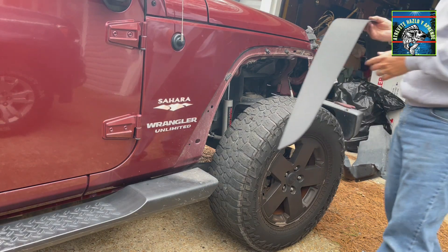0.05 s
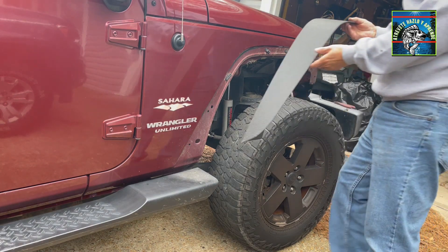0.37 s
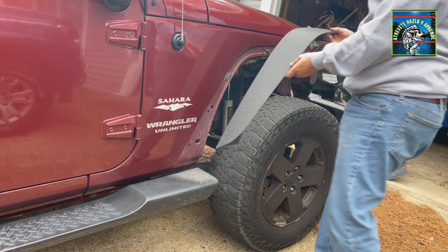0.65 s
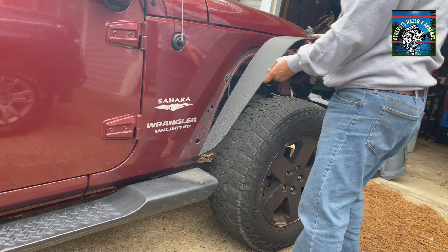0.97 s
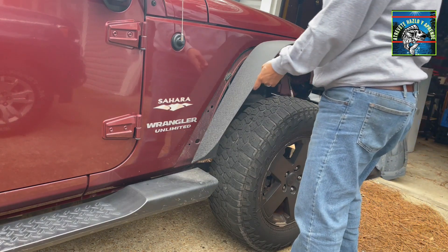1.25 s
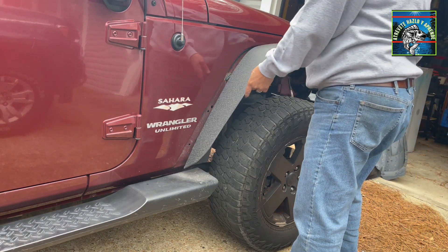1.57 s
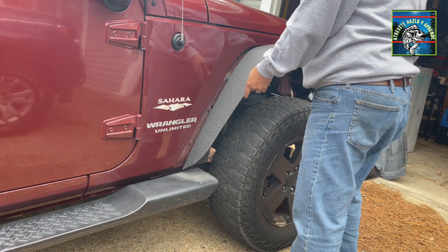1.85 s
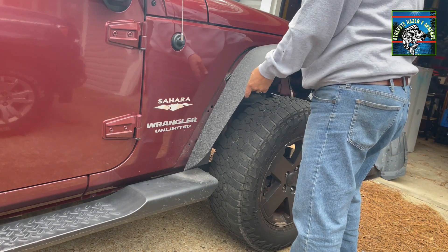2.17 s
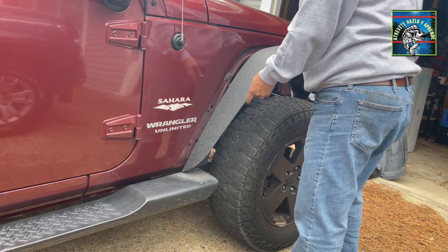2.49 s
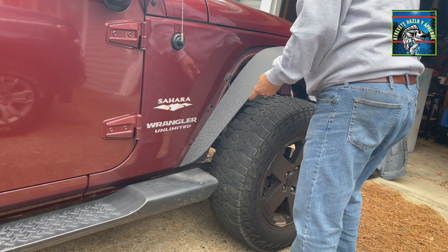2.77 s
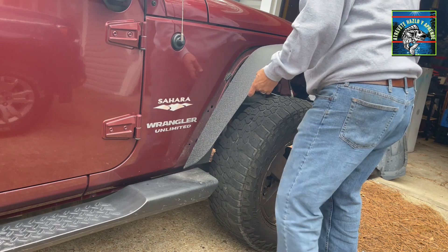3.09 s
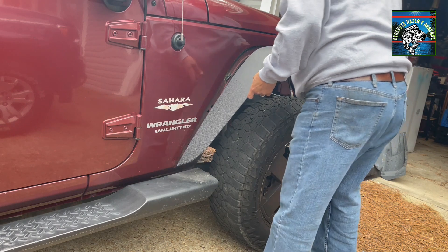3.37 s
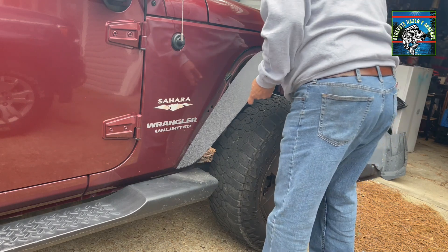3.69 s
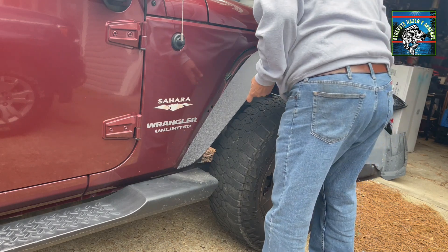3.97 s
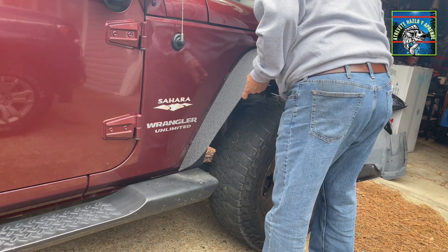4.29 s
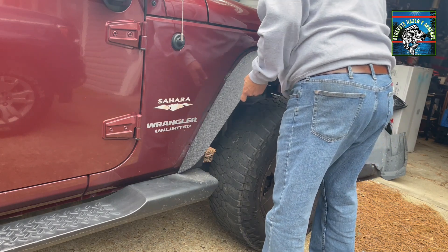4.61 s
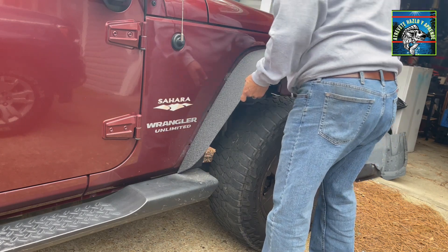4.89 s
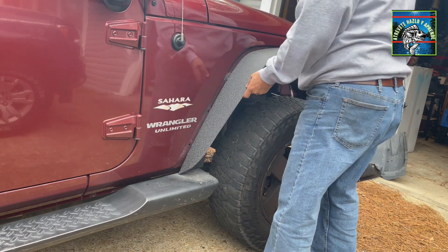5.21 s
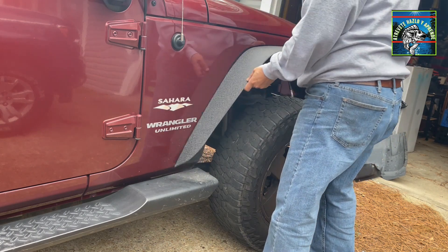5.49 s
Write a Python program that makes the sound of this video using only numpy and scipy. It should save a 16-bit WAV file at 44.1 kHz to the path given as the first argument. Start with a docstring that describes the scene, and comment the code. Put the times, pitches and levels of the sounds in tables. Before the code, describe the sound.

A low outdoor rumble with faint hiss runs throughout. For the first second and a half there are only light ticks and scuffs from a plastic fender panel being handled. At about 1.6 seconds it clatters against a car's steel body: hollow clacks with a brief ring, a buzzing edge and a dull boom. A soft rub and clothing brush follow, then a sharp crack at 2.3 seconds. Small clicks near 3.1 seconds lead to a run of knocks from 3.3 to 3.8. Grainy rubbing of plastic on paint builds, swelling with scuffs and knocks around 4.3 seconds. The loudest crack comes at 4.6, with a quick chatter behind it. The rubbing continues under two more knocks at about 5.4 and 5.5 seconds. The contacts are close and slightly to the left, with a short, dull echo off the ground and the car.

```python
"""A plastic fender panel knocks and chatters against the steel wing of a parked car as it is fitted.
The plastic clacks and rings, its edge buzzes and the bodywork booms after it.
Sharp contacts, from light clicks to hard cracks, each leave a brief pitched ring.
Between knocks the panel scuffs, ticks and slides along the paint, and clothes brush past.
The ground and the car's side throw back a short echo, all over a low outdoor rumble."""
import sys
import numpy as np
from scipy import signal
from scipy.fft import rfft, irfft
from scipy.io import wavfile
from scipy.ndimage import uniform_filter1d

SR = 44100
rng = np.random.default_rng(int(sys.argv[2]) if len(sys.argv) > 2 else 0)


def generate_wav(signal):
    """Clip the signal to [-1, 1] and save it as 16-bit WAV at the path in sys.argv[1]."""
    frames = np.transpose(np.atleast_2d(signal))
    scaled = np.clip(frames, -1, 1) * 32767
    pcm = np.round(scaled).astype(np.int16)
    wavfile.write(sys.argv[1], SR, pcm)


N = 244604

# bright tick of plastic: freq_hz, density_db
TICK_COLOUR = [(700, -42), (1500, -1), (2200, 4.5), (3100, -1.5), (3900, -1.5), (6500, -12.5),
               (11000, -8.5), (14000, -21)]
# the edge buzzing on steel: freq_hz, density_db
BUZZ_COLOUR = [(900, -9), (1500, 5.5), (2200, 3), (2900, -1), (3500, -7), (4500, -24), (7000, -43)]
# fine friction hiss: freq_hz, density_db
HISS_COLOUR = [(3000, -1.5), (7000, -3), (10000, -1), (12500, -4.5), (15000, -18)]


def knocks(contact_s=0.00052):
    """Each contact sets the plastic clacking and ringing, rattles its edge and shakes the steel."""
    # panel meets body: start_s, clack_db, clack_t60_s, ring_db, favoured_hz, boom_db, rattle_db
    hits = [(1.535, -35.5, 0.19, -44.5, 330, -40, -58), (1.603, -19, 0.15, -27.5, 587, -40, -47),
            (1.611, -18.5, 0.087, -24.5, 440, -24.5, -54), (1.631, -36, 0.11, -28.5, 434, -41, -48),
            (1.640, -40, 0.12, -50, 450, -40, -41), (1.660, -26.5, 0.25, -28.5, 290, -27.5, -53),
            (1.702, -33.5, 0.23, -30.5, 240, -28.5, -55), (1.738, -37, 0.23, -42, 300, -37.5, -53.5),
            (1.764, -44, .16, -36, 260, -43, -74), (2.3274, -20, 0.048, -26.5, 523, -34.5, -47.5),
            (2.341, -37, .06, -33.5, 290, -31.5, -72), (2.393, -45, .12, -45, 500, -42.5, -60),
            (3.316, -20, 0.18, -38.5, 170, -26.5, -50), (3.349, -33, 0.16, -42, 700, -33.5, -57),
            (3.384, -31.5, 0.26, -36, 175, -32, -56), (3.415, -27, .11, -36, 544, -43, -57.5),
            (3.43, -34, .11, -41.5, 405, -47, -62), (3.499, -38, .1, -44, 600, -52, -63),
            (3.508, -33.5, 0.12, -39.5, 376, -53, -65), (3.687, -31.5, 0.26, -41.5, 318, -44, -47),
            (3.826, -38, 0.11, -45.5, 385, -41, -74), (4.254, -33.5, 0.19, -52, 620, -47, -61),
            (4.333, -27, 0.15, -44, 332, -39, -46.5), (4.371, -43, 0.11, -41, 220, -31.5, -70),
            (4.441, -43, 0.15, -46.5, 376, -32.5, -59), (4.6086, -20, 0.064, -17, 348, -26, -36.5),
            (4.622, -30, 0.041, -24, 320, -26.5, -49), (4.637, -34, 0.11, -27.5, 370, -29, -51),
            (4.658, -22, 0.052, -43, 298, -27, -42), (4.667, -21.5, 0.088, -44, 520, -32, -41),
            (4.678, -26, 0.18, -41, 170, -38, -51), (4.700, -37, 0.085, -50, 404, -41, -58),
            (5.123, -54, .1, -53, 250, -37.5, -53), (5.215, -58, 0.18, -52, 396, -42, -71),
            (5.402, -26.5, 0.2, -40, 327, -40.5, -53), (5.525, -26.5, 0.27, -29, 345, -29.5, -48.5)]
    # loosely held plastic panel: pitch_hz, level_db, t60_s
    panel_modes = [(168.7, -15, 0.48), (214, -9.5, 0.31), (246.6, -6.5, 0.25), (290.5, -6.5, 0.18),
                   (318, 1.5, 0.12), (351, -4, 0.077), (386, -4, 0.11), (422.6, -3, 0.15),
                   (459, -5.5, 0.17), (506.5, -4, 0.13), (545.6, -3, 0.12), (619, -4, 0.12),
                   (657, -13.5, 0.16), (756, -25, 0.3), (868, -10, 0.19), (956, -10.5, 0.15)]
    # its stiff edge: pitch_hz, level_db, t60_s
    edge_modes = [(1950, -0.5, 0.23), (2066, 5, 0.099), (2146, 2, 0.1), (2343, 3, 0.11), (2445, -5, 0.15),
                  (2684, -4, 0.08), (2830, 1, 0.07), (3240, -1, 0.067), (3250, -15, 0.055),
                  (5100, -13, 0.087)]
    # steel wing and door: pitch_hz, level_db, t60_s
    body_modes = [(66.2, -5, 0.39), (82.7, -3, 0.36), (100.4, -3.5, 0.44), (111.9, 0, 0.56),
                  (128.6, 4, 0.2), (146, 1.5, 0.25), (165.5, 0.5, 0.28), (191.4, -3.5, 0.24),
                  (218.8, -8, 0.7), (247, -9, 0.64), (312, -17, 0.99)]
    # deep shudder of the whole car: freq_hz, density_db
    shudder_colour = [(30, -17), (55, -1), (85, -6), (120, -12), (200, -9.5), (600, -81)]
    # hands ease off or press the panel home: time_s, damping_ratio
    grip = [(1.65, 1.15), (1.8, .8), (2.33, 1.4), (2.37, 1.9), (2.45, .9), (3.35, .75), (3.7, .7),
            (4.35, 1.15), (4.65, .8), (4.665, 2.3), (4.75, 1.3), (5.4, .7)]
    out, t = np.zeros((2, N)), np.arange(SR // 2) / SR
    attack = 1 - np.exp(-t / contact_s)
    for start_s, clack_db, clack_t60, ring_db, favoured_hz, boom_db, rattle_db in hits:
        age = np.cumsum(np.interp(start_s + t, *np.transpose(grip))) / SR  # a firm grip chokes the ring
        chatter = undb(1.5 * wander(437, len(t)))
        clack = undb(clack_db - 6) * plastic_clack(t, clack_t60)
        tick = undb(rattle_db - 3) * fade(t, 0.14) * noise(TICK_COLOUR, len(t), spread=0.19)
        buzz = undb(rattle_db - 1) * fade(t, 0.22) * noise(BUZZ_COLOUR, len(t), spread=0.26)
        edge = undb(rattle_db - 4) * ring(
            edge_modes, t, t, scatter_db=5, detune=0.0065, flex=0.006, rise_cycles=0.47, spread=0.74)
        panel = undb(ring_db - 1) * ring(
            struck_at(panel_modes, favoured_hz), t, age,
            scatter_db=3, detune=0.016, flex=0.02, rise_cycles=0.24, spread=0.51)
        steel = undb(boom_db - 4) * ring(
            body_modes, t, age, scatter_db=3, detune=0.035, flex=0.026, rise_cycles=1.57, spread=2.2)
        swell = (1 - np.exp(-t / 0.011)) * fade(age, 1.0)
        shudder = undb(boom_db - 12) * swell * noise(shudder_colour, len(t), spread=1.3)
        add(out, start_s, attack * (clack + chatter * (tick + buzz) + edge + panel) + steel + shudder)
    return out


def plastic_clack(t, t60, split_hz=900):
    """Crowded panel modes blur into a noise burst; its two bands die almost together."""
    # the crowded modes: freq_hz, density_db
    colour = [(150, -24), (350, -11.5), (600, -0.5), (950, -11), (1250, -9.5), (1550, -17.5), (2500, -50),
              (5000, -35.5), (10000, -54)]
    burst = noise(colour, len(t), spread=0.45)
    low = signal.sosfiltfilt(signal.butter(3, split_hz, fs=SR, output="sos"), burst)
    return low * fade(t, t60) + (burst - low) * fade(t, 0.99 * t60)


def ring(modes, t, age, scatter_db, detune, flex, rise_cycles, spread):
    """Struck modes, detuned anew each blow and wavering as the sheet flexes; they decay along age."""
    out = np.zeros((2, len(t)))
    for hz, db, t60 in modes:
        strength, pitch, phase, side = rng.standard_normal(4)
        cycles = hz * np.cumsum(1 + detune * pitch + flex * wander(45, len(t))) / SR
        swell = 1 - np.exp(-cycles / rise_cycles)  # bending waves take time to fill the sheet
        envelope = undb(db + scatter_db * strength) * swell * fade(age, t60)
        stereo_phase = spread * side * min((hz / 620) ** 2, 1) * np.array([[1], [-1]])
        out += envelope * np.sin(2 * np.pi * (cycles + phase) + stereo_phase)
    return out / np.sqrt(np.mean(out[:, :SR // 20] ** 2))


def struck_at(modes, favoured_hz, boost_db=8.5, octaves=0.3):
    """Modes near one pitch stand out, having an antinode at the point of contact."""
    return [(hz, db + boost_db * np.exp(-(np.log2(hz / favoured_hz) / octaves) ** 2), t60)
            for hz, db, t60 in modes]


def snaps(rise_s=0.00035, corner_width=0.079):
    """Sharp contacts, from light clicks to hard cracks, briefly ring the struck corner and the lip."""
    # edge meets steel: start_s, snap_db, corner_hz, corner_db, favoured_hz, lip_db
    hits = [(0.9726, -58, 2800, -47, 1100, -58.5), (1.602, -43, 3400, -44, 1230, -42),
            (1.612, -43, 2080, -57, 830, -35), (1.640, -45, 2850, -37.5, 850, -39),
            (2.3273, -28, 3380, -36.5, 1430, -36.5), (2.3276, -43, 5900, -48, 980, -34.5),
            (2.329, -47, 2150, -38, 950, -45), (3.078, -58, 1720, -48, 1110, -51),
            (3.205, -62, 3670, -50, 960, -57), (3.315, -42, 4430, -51, 720, -41),
            (3.319, -40, 2060, -47, 1220, -31.5), (4.6085, -16.5, 2220, -27.5, 960, -27),
            (4.659, -42, 3700, -45.5, 1110, -36), (4.668, -47, 2900, -34.5, 1140, -32.5),
            (4.675, -50, 2350, -33, 960, -37), (5.117, -58, 4730, -47, 1100, -59),
            (5.401, -58, 3950, -53, 1110, -40)]
    # the opening transient: freq_hz, density_db
    snap_colour = [(400, -15), (1100, 17.5), (1600, -7), (2200, 4), (2700, 7), (3400, -6), (4200, 1),
                   (6300, -10), (11000, -3), (14000, -31)]
    # the panel's folded lip: pitch_hz, level_db, t60_s
    lip_modes = [(747, -3.5, 0.24), (824, 4.5, 0.079), (893, -4, 0.1), (961, 7, 0.078), (1126, 4.5, 0.059),
                 (1240, -2, 0.15), (1308, -5, 0.14), (1410, -2, .07), (1724, -9.5, 0.092)]
    out, t = np.zeros((2, N)), np.arange(2 ** 14) / SR
    near, far = 1 + corner_width, 1 + 2 * corner_width
    for start_s, snap_db, hz, corner_db, favoured_hz, lip_db in hits:
        snap = undb(snap_db) * fade(t, 0.014) * noise(snap_colour, len(t), spread=0.43)
        peak = [(hz / far, -40), (hz / near, -4), (hz, 0), (hz * near, -6), (hz * far, -40)]
        corner = undb(corner_db) * fade(t, 0.046) * noise(peak, len(t), spread=0.37)
        lip = undb(lip_db - 2) * ring(
            struck_at(lip_modes, favoured_hz), t, t,
            scatter_db=1.5, detune=0.009, flex=0.006, rise_cycles=0.26, spread=0.6)
        add(out, start_s, (1 - np.exp(-t / rise_s)) * (snap + corner) + lip)
    return out


def scuffs(firm_db=-44, stop_s=0.019):
    """The edge slips: one dry catch, then a run of tiny ones that dies as it comes to rest."""
    # short slips: start_s, length_s, level_db, brightness_db
    slips = [(0.038, 0.0017, -60.5, 0), (0.905, 0.027, -52.5, -6.5), (0.97, .001, -61, -6),
             (3.078, 0.0017, -48.5, 9.5), (3.179, 0.027, -52.5, 2), (4.246, 0.05, -54, 11),
             (4.325, 0.021, -46.5, 12), (4.439, 0.0039, -44.5, 5), (4.543, .002, -50.5, 10),
             (5.115, 0.0038, -50, 10), (5.506, 0.0044, -45, 7)]
    # high rasp of the edge: freq_hz, density_db
    rasp_colour = [(1200, -44), (2500, -0.5), (3600, 2), (4900, 3), (5800, -0.5), (7000, -12), (10000, -11)]
    # dull scrape beneath it: freq_hz, density_db
    scrape_colour = [(150, -0.5), (400, -0.5), (1050, 2), (1500, -14), (2200, -33), (7000, -71)]
    out, t = np.zeros((2, N)), np.arange(2 ** 13) / SR
    for start_s, length_s, db, brightness_db in slips:
        grains = np.exp(-np.maximum(t - length_s, 0) / stop_s) * undb(4 * wander(700, len(t)))
        catch = undb(2) * fade(t, 0.012)
        rise_s = 0.00054 * max(1, undb(firm_db - db))  # a light touch starts more softly
        layers = [(rasp_colour, db + brightness_db / 2 - 7),
                  (BUZZ_COLOUR, db - brightness_db / 2 + 1),
                  (scrape_colour, db + 2),
                  (HISS_COLOUR, -63 + 0.21 * (db - firm_db))]  # hiss grows only a little with pressure
        texture = sum(undb(level) * noise(colour, len(t), spread=0.18) for colour, level in layers)
        add(out, start_s, (1 - np.exp(-t / rise_s)) * (grains + catch) * texture)
    return out


def slide(press_from_s=3.33, press_rise_s=0.97, press_db=-48.5):
    """Plastic rubs on paint in fine grains and slower jerks; once seated and pressed, it keeps rubbing."""
    # pushes along the paint: peak_s, length_s, level_db
    pushes = [(1.99, 0.18, -53), (3.63, 0.19, -50), (4.29, 0.12, -38), (4.6, 0.053, -37.5),
              (5.2, 0.083, -47), (5.54, 0.25, -44.5)]
    # the rub: freq_hz, density_db
    colour = [(80, -14), (160, 17), (400, 4.5), (1000, 6), (2300, -7.5), (5500, -23), (11000, -35),
              (14000, -62)]
    pressed = undb(press_db) * np.clip((np.arange(N) / SR - press_from_s) / press_rise_s, 0, 1)
    roughness = undb(3 * wander(500, N) + wander(35, N))
    return np.hypot(strokes(pushes), pressed) * unit(roughness * noise(colour, N, spread=0.44))


def taps():
    """Fingers and edge click on the plastic, too lightly to set the panel ringing."""
    # light touches: start_s, tick_db, hiss_db
    touches = [(.086, -48.5, -71), (0.458, -55, -55), (0.47, -55, -55), (0.523, -57, -54), (.974, -47, -72),
               (1.0, -62, -56), (1.183, -74, -59.5), (1.739, -46, -43.5), (3.079, -48, -56),
               (3.181, -52, -58), (3.206, -52, -53), (3.377, -59, -51.5), (4.327, -52, -44),
               (4.338, -41, -49), (4.44, -56, -64)]
    out, t = np.zeros((2, N)), np.arange(2 ** 12) / SR
    envelope = undb(5) * fade(t, 0.0049) + undb(-6) * fade(t, 0.13)  # crisp click, faint tail
    for start_s, tick_db, hiss_db in touches:
        tick = undb(tick_db - 2) * noise(TICK_COLOUR, len(t), spread=0.37)
        hiss = undb(hiss_db - 2) * noise(HISS_COLOUR, len(t), spread=0.41)
        add(out, start_s, envelope * (tick + hiss))
    return out


def cloth(rest_db=-83):
    """Fibres catch as folds brush past each other; the clothes are never quite still."""
    # a sleeve or trouser leg passes: peak_s, length_s, level_db
    brushes = [(.11, 0.15, -65.5), (.62, 0.57, -70), (.95, 0.06, -69), (1.66, 0.06, -54.5),
               (1.98, 0.13, -60), (2.41, .05, -64), (3.0, 0.2, -67), (3.4, 0.054, -72), (3.64, 0.14, -61),
               (3.908, 0.035, -55), (4.04, 0.029, -59), (4.28, 0.12, -53), (5.25, .2, -68.5)]
    folds = undb(3 * wander(600, N) + 2 * wander(40, N))
    return np.hypot(strokes(brushes), undb(rest_db)) * unit(folds * noise(HISS_COLOUR, N, spread=0.24))


def through_panel(x, ring_db=-1, t60=0.048):
    """The panel's crowded modes give friction a hollow, grainy colour."""
    t = np.arange(2 ** 12) / SR
    modes = noise([(100, 0), (10000, 0.01)], len(t), spread=0.39) * fade(t, t60)
    hollow = signal.fftconvolve(x, modes / np.sqrt(np.sum(modes[0] ** 2)), axes=1)[:, :N]
    return (x + undb(ring_db) * hollow) / np.hypot(1, undb(ring_db))


def driveway(x, wet_db=-13, t60=0.3, predelay_s=0.0046):
    """Ground, car side and house front scatter a short, dull echo."""
    t = np.arange(2 ** 14) / SR
    colour = [(100, 4.5), (500, 5.0), (2000, -1.0), (6000, -18.0), (14000, -8.5)]  # freq_hz, density_db
    echo = noise(colour, len(t), spread=0.56, wide_hz=340) * fade(t, t60) * (t > predelay_s)
    return x + undb(wet_db) * signal.fftconvolve(x, echo / np.sqrt(np.sum(echo ** 2)), axes=1)[:, :N]


def place_left(x):
    """The panel is nearer the left microphone: louder there and a little earlier."""
    # left against right: freq_hz, balance_db, lead_rad
    balance = [(100, 0, .03), (400, 2, 0.073), (880, 3.5, 0.091), (1840, 1.5, 0.12), (4060, 5, 0.47),
               (10400, -1, 1.61)]
    hz = np.fft.rfftfreq(2 * N, 1 / SR)
    left = undb(curve(balance, hz) / 2) * np.exp(.5j * curve(balance, hz, column=2))
    return irfft(rfft(x, 2 * N) * np.array([left, 1 / left]))[:, :N]


def outdoors(split_hz=150, air_db=-42, rumble_db=-42.5, waver_db=1.5, left_db=0.5):
    """An even low rumble under a far hiss that wavers slightly."""
    # open-air bed: freq_hz, density_db
    colour = [(15, -24), (25, -25), (51, -5.5), (76, -1.5), (164, -15), (219, -21), (257, -22.5),
              (293, -22.5), (392, -24), (966, -25), (1160, -30), (6330, -56.5), (8030, -55.5),
              (9660, -57.5), (14000, -66.5)]
    air = undb(air_db) * noise(colour, N, spread=1.0, wide_hz=210)
    low = signal.sosfiltfilt(signal.butter(4, split_hz, fs=SR, output="sos"), air)
    rumble = unit(low) * undb(rumble_db)
    hiss = (air - low) * undb(waver_db * wander(5.14, N))
    return (rumble + hiss) * undb([[left_db], [-left_db]])


def noise(colour, size, spread, wide_hz=380):
    """Coloured stereo noise, rms 1, that widens above wide_hz."""
    hz = np.fft.rfftfreq(size, 1 / SR)
    mid, side = rfft(rng.standard_normal((2, size))) * undb(curve(colour, hz))
    side = side * spread * (1 - 0.87 / (1 + (hz / wide_hz) ** 4))
    return unit(irfft(np.array([mid + side, mid - side]), size))


def wander(rate_hz, size):
    """Smooth random modulation, rms 1."""
    hold = max(int(SR / rate_hz), 1)
    steps = np.repeat(rng.standard_normal(size // hold + 1), hold)
    return unit(uniform_filter1d(steps, hold)[:size])


def strokes(moves):
    """A bell-shaped swell for each movement as it speeds up and slows down."""
    t = np.arange(N) / SR
    return sum(undb(db) * np.exp(-2 * ((t - peak_s) / length_s) ** 2) for peak_s, length_s, db in moves)


def curve(points, hz, column=1):
    """A table column interpolated over log frequency."""
    points = np.array(points)
    return np.interp(np.log(hz + 1e-9), np.log(points[:, 0]), points[:, column])


def add(track, start_s, sound):
    start = max(int(start_s * SR), 0)
    track[:, start:start + sound.shape[1]] += sound[:, :N - start]


def fade(t, t60):
    return np.exp(-np.log(1000) * t / max(t60, 1e-3))


def undb(db):
    return 10 ** (np.asarray(db) / 20)


def unit(x):
    return x / np.sqrt(np.mean(x ** 2))


def scene():
    """Blows and friction in the driveway's echo, over the outdoor bed."""
    friction = through_panel(scuffs() + slide() + cloth())
    return place_left(driveway(knocks() + snaps() + taps() + friction)) + outdoors()


def record(dry, top_hz=15500):
    """Phone microphones thin the deepest bass, notch the treble and cut the top."""
    # microphone response: freq_hz, gain_db
    response = [(20, -19), (42, -1.5), (6800, -1), (7500, -10), (8200, -26.5), (9000, -5.5), (9600, -4.5),
                (13500, -3), (14500, -22)]
    gain = undb(curve(response, np.fft.rfftfreq(2 * N, 1 / SR)))
    coloured = irfft(rfft(dry, 2 * N) * gain)[:, :N]
    return signal.sosfilt(signal.ellip(8, .2, 70, top_hz, fs=SR, output="sos"), coloured)


dry = scene()
out = record(dry)
generate_wav(out)
```